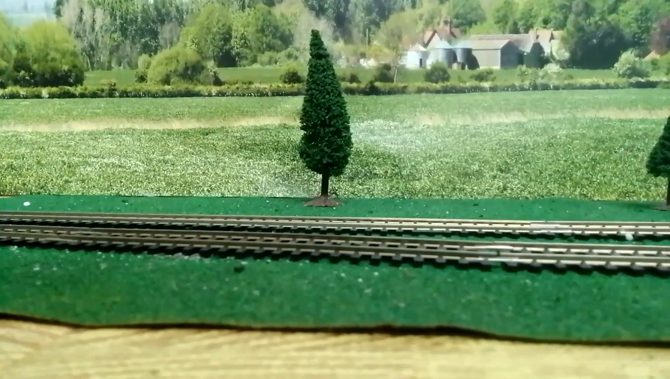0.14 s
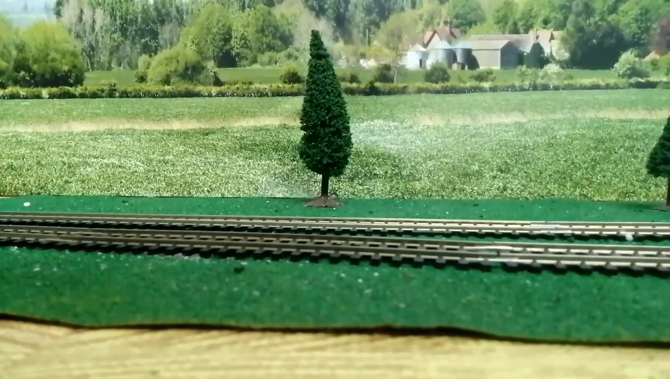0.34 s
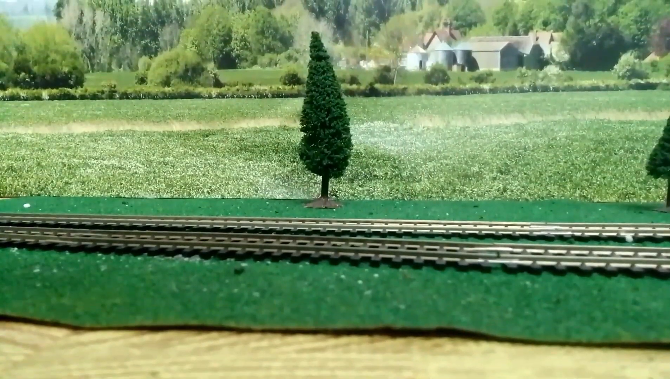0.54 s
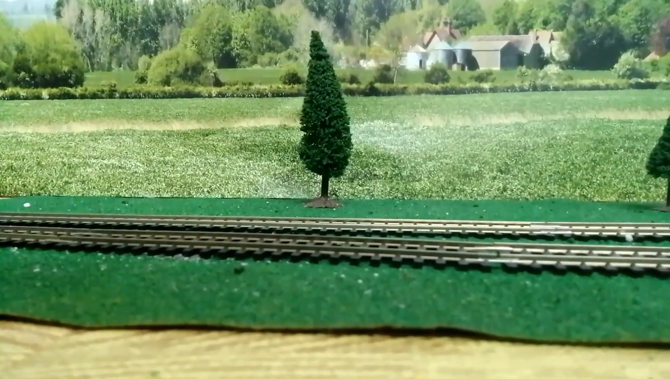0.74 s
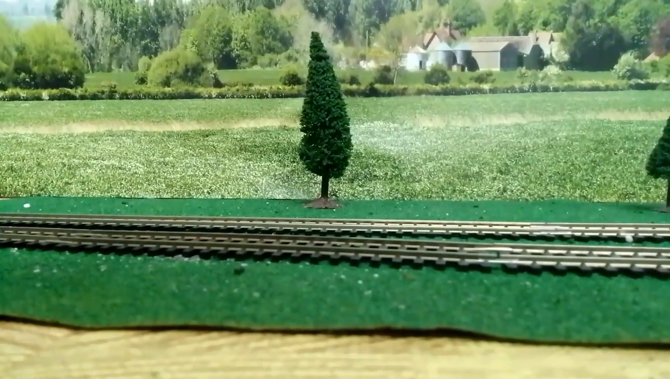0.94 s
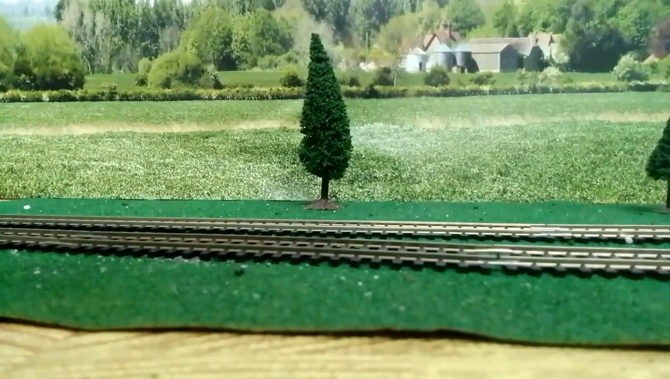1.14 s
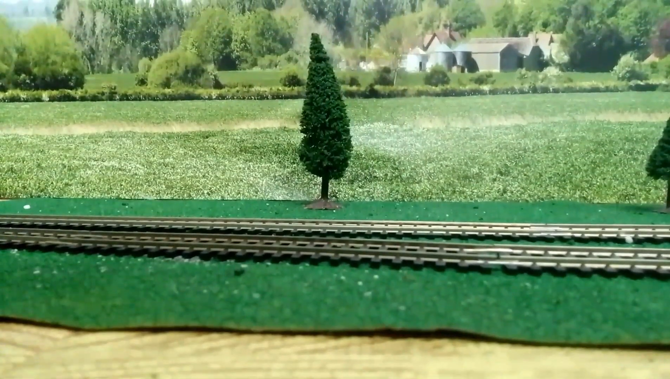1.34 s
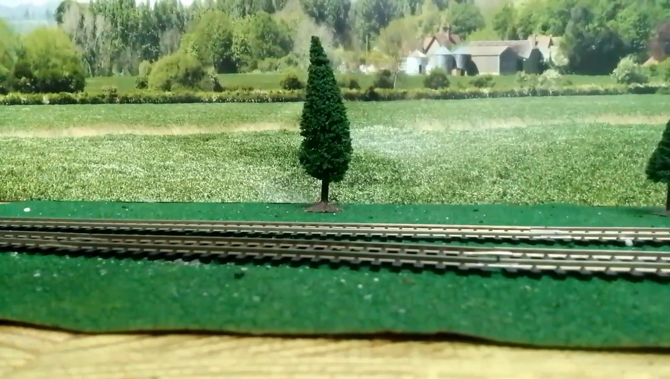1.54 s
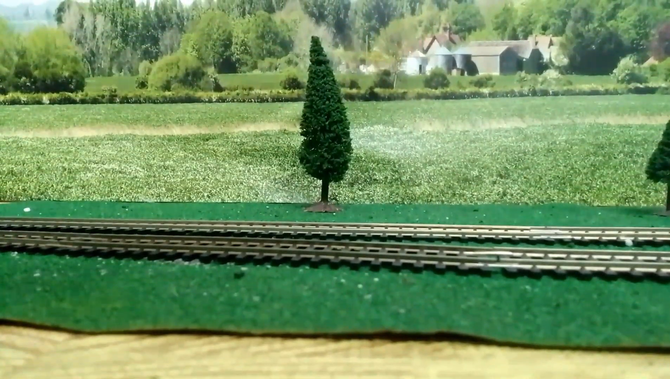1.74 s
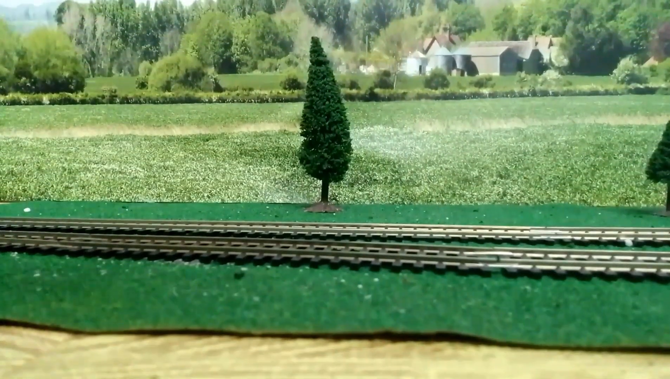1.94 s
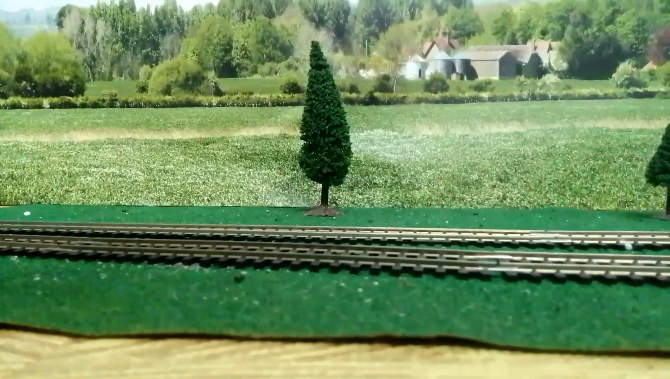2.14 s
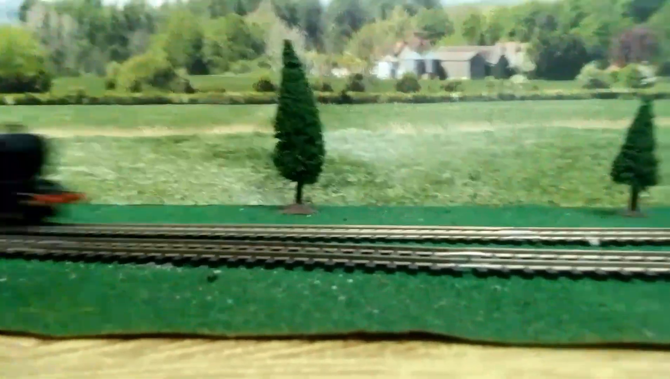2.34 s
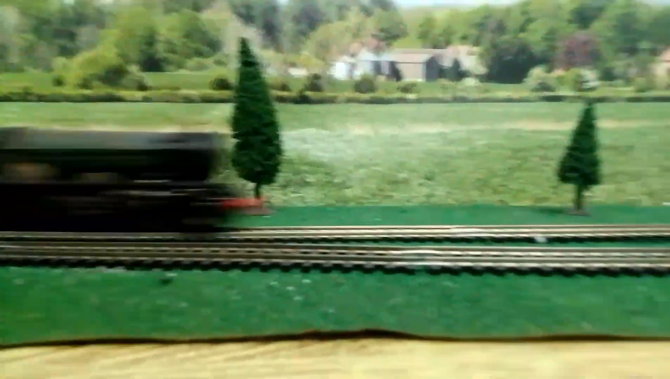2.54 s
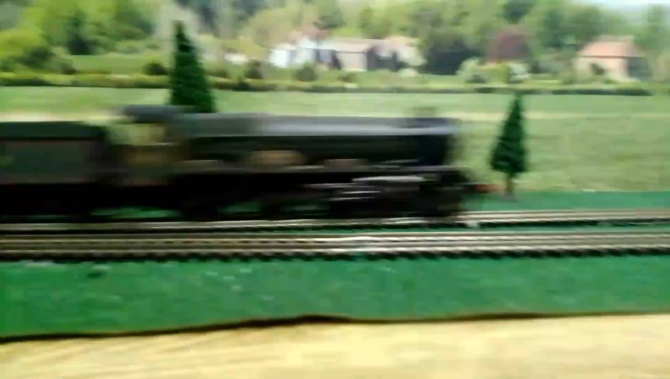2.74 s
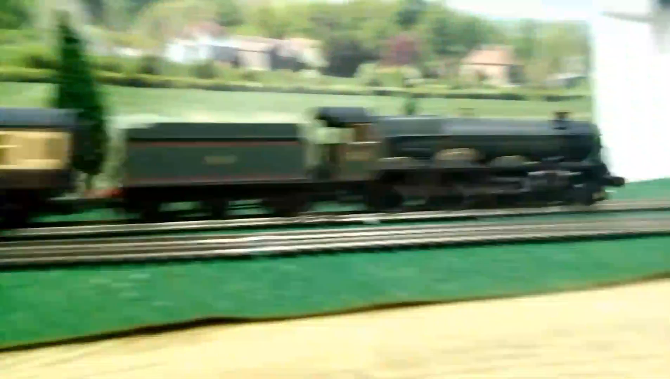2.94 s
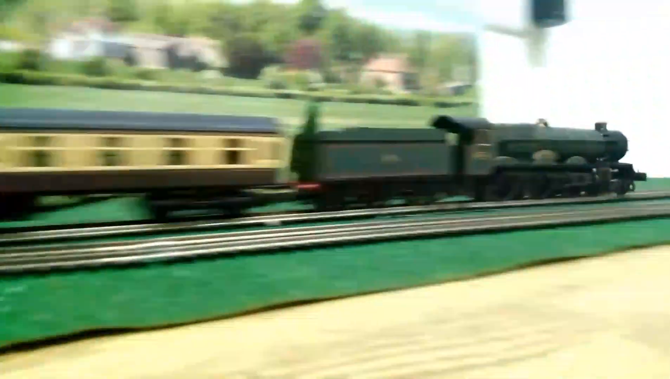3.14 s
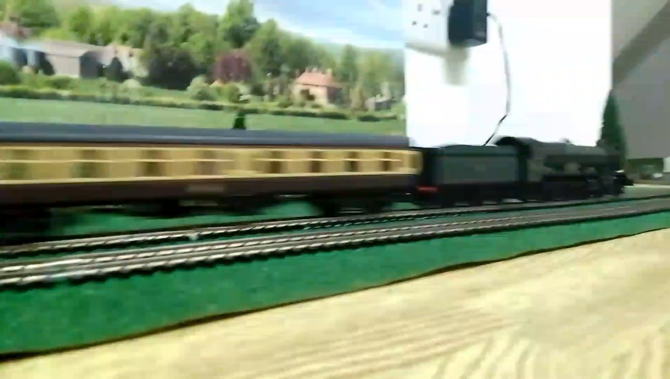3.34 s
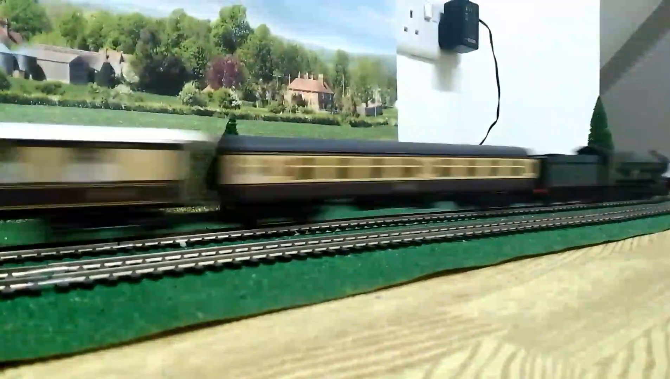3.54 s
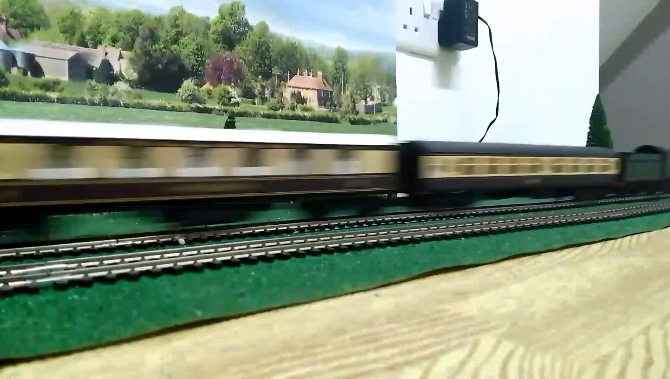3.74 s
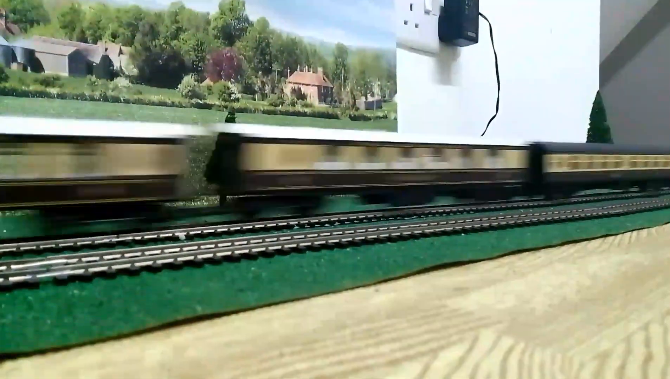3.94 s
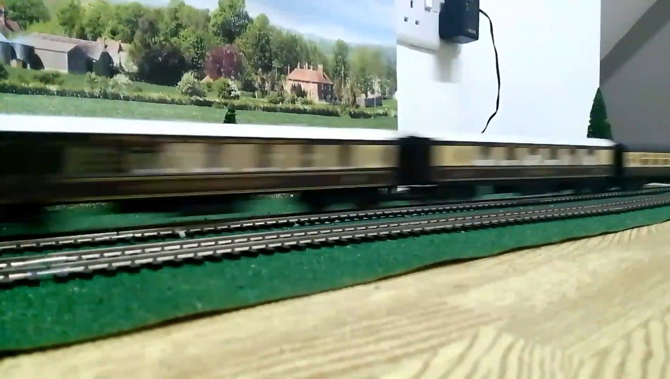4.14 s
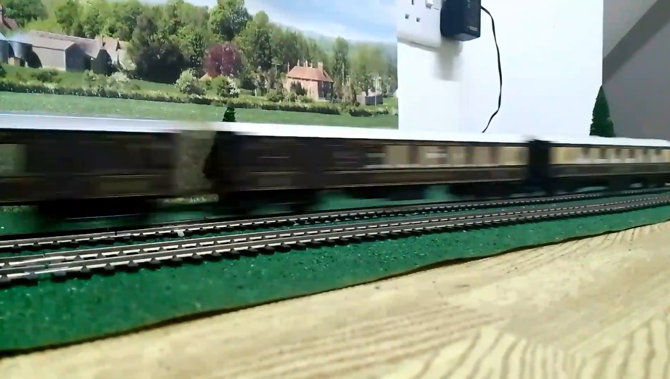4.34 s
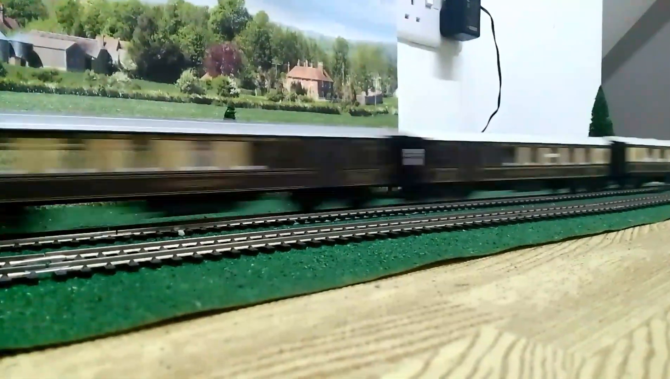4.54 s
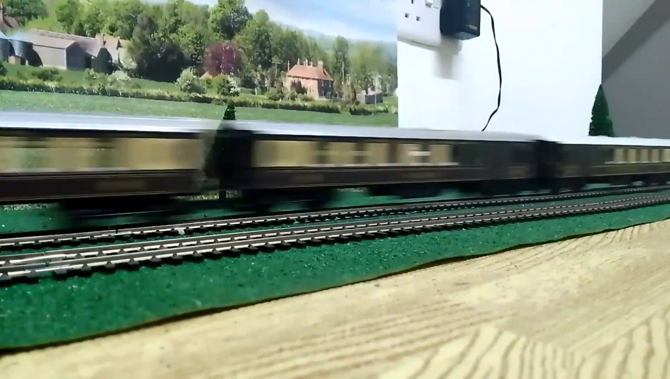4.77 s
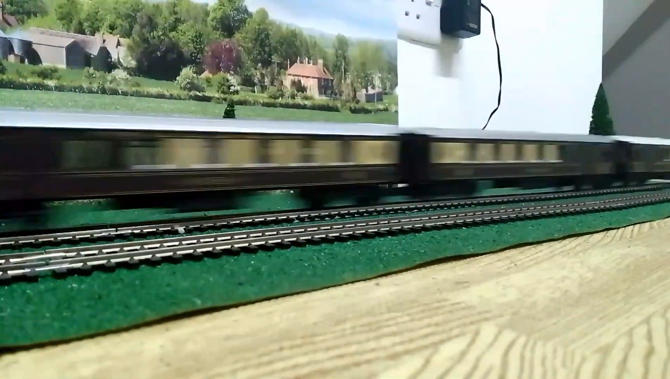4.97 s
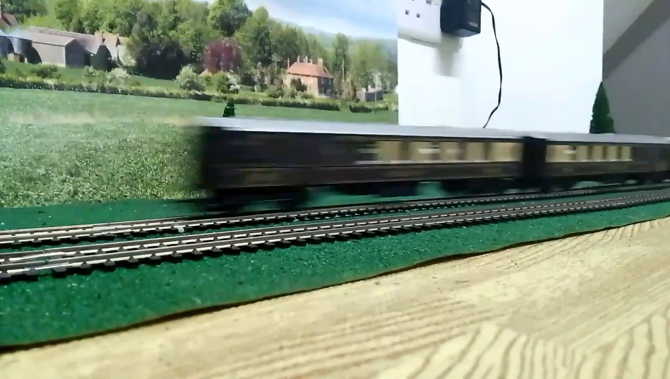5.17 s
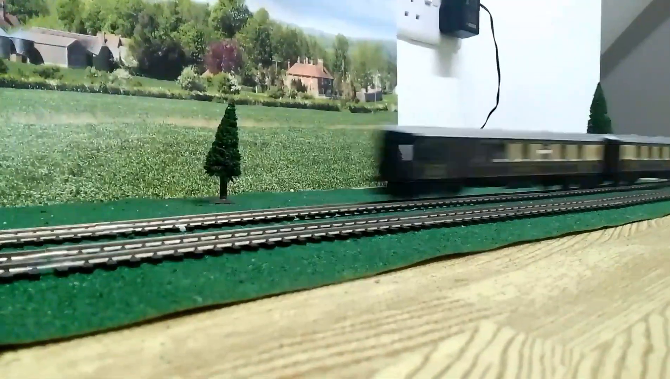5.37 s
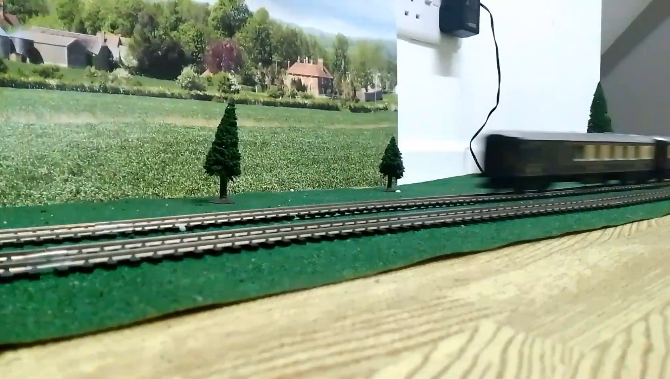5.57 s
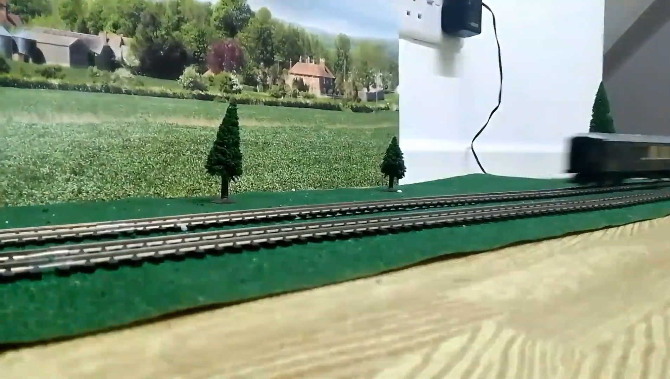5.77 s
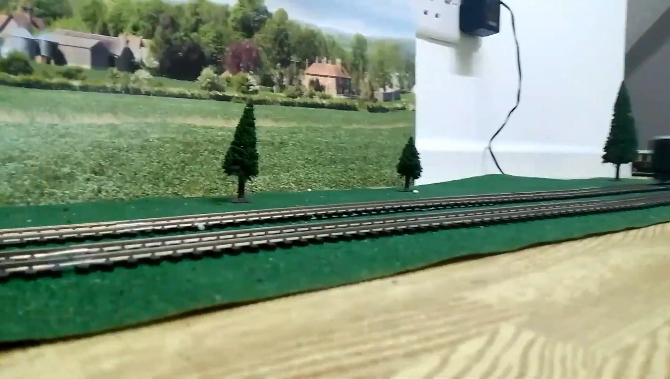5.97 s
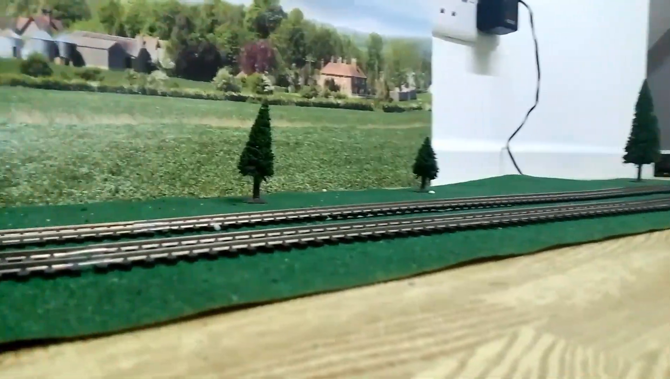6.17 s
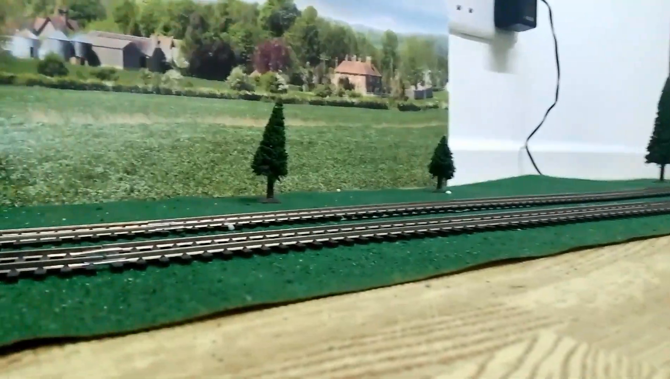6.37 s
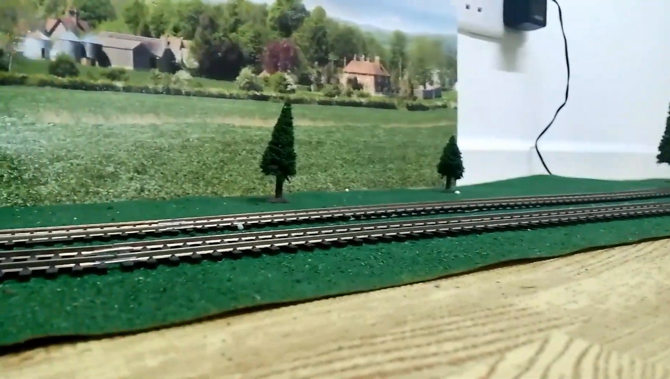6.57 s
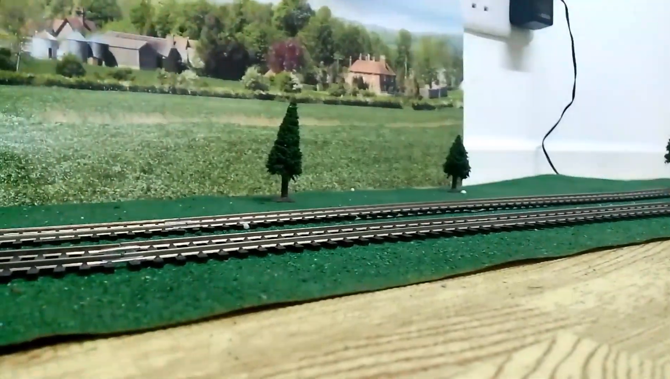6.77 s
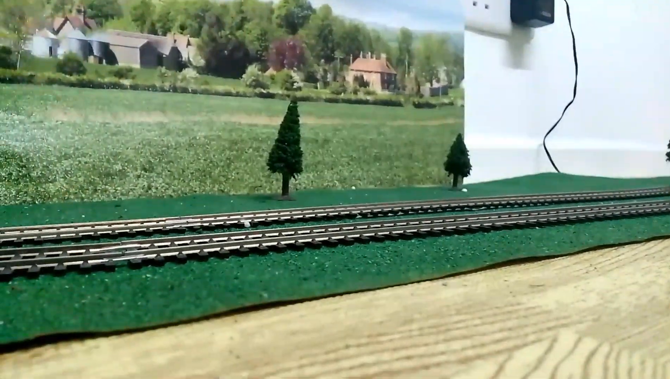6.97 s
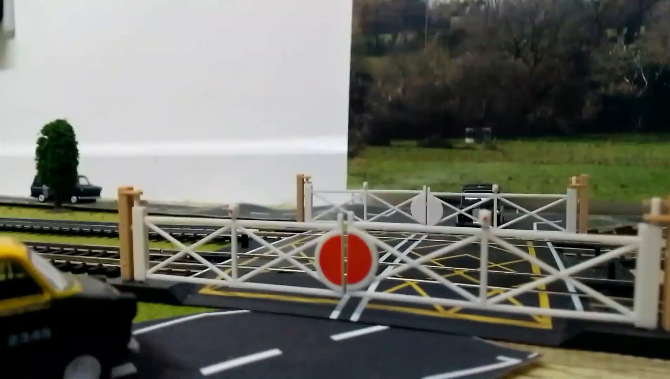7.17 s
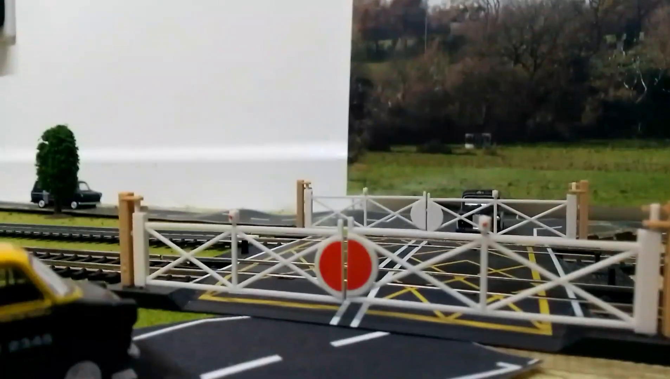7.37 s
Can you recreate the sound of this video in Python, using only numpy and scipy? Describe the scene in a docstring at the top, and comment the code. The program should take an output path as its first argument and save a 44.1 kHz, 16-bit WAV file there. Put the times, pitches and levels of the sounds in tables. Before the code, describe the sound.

A model train rolls fast past on hissing rails, with clicking wheels, rasping gears and a drumming wooden board, then fades away.

```python
"""Small wheels chatter on hissing rails and a wooden baseboard drums and hums, as a model steam engine
pulls five coaches fast towards a phone and close past it. Wheels click over rail joints, their rims rub
and sing, and the gears rasp as the engine goes by. The phone's noise suppressor turns down the weak
frequency bands while the train is far off, and the sound stops dead near the end."""
import sys
import numpy as np
from scipy import signal
from scipy.fft import rfft, irfft, next_fast_len
from scipy.io import wavfile
from scipy.ndimage import uniform_filter1d

SR = 44100
rng = np.random.default_rng(int(sys.argv[2]) if len(sys.argv) > 2 else 0)


def int16_out(signal):
    """Quantize to a 16-bit WAV file."""
    q = np.round(np.clip(np.atleast_2d(signal).T, -1, 1) * 32767)
    wavfile.write(sys.argv[1], SR, q.astype(np.int16))


N = 326820
TIME = np.arange(N) / SR

# the tone of each source, as how strong it is at each frequency: (f/Hz, level/dB)
BOARD_TONE = [(110, -34), (170, -25), (240, -8.5), (380, -6.5), (540, -8.5), (740, -5), (880, -4),
              (1020, 0), (1350, -1.5), (1750, -8.5), (2100, -7.5), (2500, -16), (4000, -27)]
RAIL_TONE = [(120, -52), (1500, -27), (2500, -14.5), (3300, -14), (4200, -10.5), (5200, -6.5), (5900, -3.5),
             (6350, 0.5), (7200, -5.5), (7800, -7), (8800, -13.5), (10000, -17.5), (12000, -20.5),
             (13500, -32.5), (15700, -31)]
COACH_TONE = [(120, -34.5), (600, -26), (1700, -6.5), (2100, 4.5), (2450, -4), (2750, 2.5), (3150, -5),
              (4100, 1), (4700, -3), (8500, -7.5), (10000, -27), (15000, -22.5)]
ROOM_TONE = [(25, 14), (42, -9), (60, -14), (100, -12), (300, 7), (2000, -3), (15000, -5)]
GEAR_HISS_TONE = [(120, -55), (1200, -12), (1750, 2), (2700, -34.5), (4500, -2), (5500, 5), (6600, -11.5),
                  (7600, 7), (9000, -5), (9900, -14.5), (10700, -21), (12000, -8), (14000, -30.5)]
# the treble brightens and dulls as the train goes by: (middle t/s, half length t/s, level/dB)
TREBLE_SWELLS = [(2.92, 0.16, 3), (4.385, 0.072, 4), (4.74, 0.11, -7), (4.95, .05, 1)]
# baseboard panels humming under the train: (start t/s, end t/s, f/Hz, width f/Hz, level/dB)
PANEL_HUMS = [(0.49, 3.4, 264, 6.2, -60), (0.88, 3.4, 306, 12, -57.5), (0.28, 7.3, 386, 16, -63),
              (3.55, 7.3, 230, 20, -61), (3.7, 5.15, 284.6, 8.4, -56), (0.51, 4.3, 965, 30, -56)]
# wheels striking rail joints, and the first wheel bouncing down again just after: (t/s, relative rail level/dB,
# board level/dB)
JOINT_HITS = [(0.4479, -20, -41.5), (0.459, -25.5, -45.5), (0.9492, -26, -33.5), (1.3169, -26.5, -36),
              (1.36, -32, -30), (1.552, -37, -30), (1.592, -25.5, -28), (3.869, -21.5, -43),
              (4.056, -29.5, -44.5), (4.327, -23, -43.5), (4.364, -27.5, -36), (4.655, -20.5, -41.5),
              (4.8839, -21, -40), (4.9402, -21, -43)]
# flanges (the wheels' guiding rims) rubbing the rail: (middle t/s, half length t/s, level/dB)
FLANGE_RUBS = [(.66, .2, -41.5), (3.19, 0.14, -30.5), (3.55, .12, -39.5), (3.88, 0.1, -36),
               (4.688, 0.083, -35.5), (4.983, 0.12, -35.5)]
# the notes at which the flanges and the engine's shell ring: (f/Hz, width f/Hz, relative level/dB)
FLANGE_NOTES = [(5500, 460, 0.5), (6050, 480, -2.7)]
SHELL_NOTES = [(1850, 190, -10), (2074, 90, 5.5)]
# the phone takes anything weaker than this for noise: (f/Hz, level/dB in a 1 Hz band)
NOISE_THRESHOLD = [(150, -79.5), (250, -84.5), (400, -85.5), (1700, -80.0), (3200, -79.5),
                   (4500, -78.0), (9800, -77.5), (11000, -76)]
# the phone's thin bass: (f/Hz, level/dB)
PHONE_BASS = [(40, -1.5), (75, -15.5), (140, -0.5), (230, 0)]


def amp(db):
    """Turn decibels into a number to multiply by."""
    return 10 ** (np.asarray(db) / 20)


def unit(x):
    """Scale x to an average power of 1."""
    return x / np.sqrt(np.mean(x ** 2) + 1e-20)


def along(points, hz):
    """Read between (f/Hz, value) points, with the octaves evenly spaced."""
    f, v = np.transpose(points)
    return np.interp(np.log(hz + 1), np.log(f + 1), v)


def wobble(rate):
    """A random curve that heads for a new value rate times a second."""
    values = rng.standard_normal(int(N * rate / SR) + 2)
    return np.interp(TIME * rate, np.arange(len(values)), values)


def swell(middle_s, half_s):
    """A smooth rise to 1 and fall."""
    return np.exp(-((TIME - middle_s) / half_s) ** 2 / 2)


def filtered(x, response):
    """Multiply each frequency in x by response(hz)."""
    size = next_fast_len(N + SR // 2)
    return irfft(rfft(x, size) * response(np.fft.rfftfreq(size, 1 / SR)), size)[:N]


def ring(x, tone, size=4096):
    """Let x shake an object that has this tone."""
    cepstrum = irfft(np.log(amp(along(tone, np.fft.rfftfreq(size, 1 / SR)))))
    # fold it so that the ringing comes after each tap, never before
    cepstrum[1:size // 2] *= 2
    cepstrum[size // 2 + 1:] = 0
    one_tap = irfft(np.exp(rfft(cepstrum)))
    return signal.fftconvolve(x, one_tap / np.linalg.norm(one_tap))[:N]


def resonate(x, notes):
    """Let x shake an object that rings at these notes and gives off little bass."""
    def response(f):
        peaks = sum(amp(db) * 1j * f * width / (hz * hz - f * f + 1j * f * width)
                    for hz, width, db in notes)
        return peaks * np.minimum(f / notes[0][0], 1) ** 2
    return filtered(x, response)


def passing(closest_s, reach_m, coming, going, speed_m_per_s=0.8):
    """Level in dB, 0 when closest; past reach_m it falls as distance to the power coming or going."""
    place_m = speed_m_per_s * (TIME - closest_s)
    return -10 * np.where(place_m < 0, coming, going) * np.log10(1 + (place_m / reach_m) ** 2)


def chatter(rate, spread_db, smooth_db):
    """Tiny wheel taps of uneven size, rate a second, over the smooth noise of rolling."""
    hits = (rng.random(N) < rate / SR) * rng.choice([-1, 1], N)
    sizes = amp(spread_db * np.clip(rng.standard_normal(N), -2, 2))
    return unit(unit(hits * sizes) + amp(smooth_db) * rng.standard_normal(N))


def drift(x, patchy_db, size=1024):
    """Echoes shift as the train moves, so narrow bands slowly swell and sink; the bass is spared."""
    hz, _, bands = signal.stft(x, SR, nperseg=size)
    sway = uniform_filter1d(rng.standard_normal(bands.shape), size=3, axis=0)
    sway -= uniform_filter1d(sway, size=13, axis=0)  # what one band loses its neighbours gain
    sway = uniform_filter1d(uniform_filter1d(sway, size=40, axis=1), size=12, axis=1)
    depth_db = patchy_db * along([(300, 0), (1200, 1)], hz)[:, None]
    gain = unit(amp(depth_db * np.clip(unit(sway), -2, 2)))
    return signal.istft(bands * gain, nperseg=size)[1][:N]


def rolling():
    """Wheels shake the board, rails and coaches; the board carries far, the coaches only close by."""
    board_db = -38.47 + passing(closest_s=2.78, reach_m=1.84, coming=1.24, going=0.96)
    rail_db = -32.7 + passing(closest_s=4.215, reach_m=1.594, coming=0.92, going=1.2)
    coach_db = -39.8 + passing(closest_s=4.46, reach_m=0.71, coming=0.74, going=1.44)
    # the treble opens up as the wheels come to face the phone
    lift_db = 1.5 + passing(closest_s=3.54, reach_m=2.1, coming=0.75, going=0.051)
    lift_db += sum(db * swell(s, half_s) for s, half_s, db in TREBLE_SWELLS)
    jolt_db = 0.61 * wobble(25) + 0.6 * wobble(140)  # all three share the bumps of the ride
    board = amp(board_db) * ring(chatter(rate=1200, spread_db=2, smooth_db=2), BOARD_TONE)
    rails = amp(rail_db) * ring(chatter(rate=1400, spread_db=2, smooth_db=2.5), RAIL_TONE)
    coaches = amp(coach_db) * ring(chatter(rate=900, spread_db=3.5, smooth_db=-4), COACH_TONE)
    treble = filtered(rails + coaches, lambda hz: along([(6800, 0.099), (8600, 0.6)], hz))
    ride = board + rails + coaches + (amp(lift_db) - 1) * treble
    return drift(amp(jolt_db) * ride, patchy_db=1.83)


def room():
    """The faint hush of the room."""
    return amp(-58) * unit(ring(rng.standard_normal(N), ROOM_TONE))


def panels(fade_s=0.3):
    """Each panel of the baseboard hums at its own note while the train crosses it."""
    hum = np.zeros(N)
    for start, end, hz, width, db in PANEL_HUMS:
        load = np.clip(np.minimum(TIME - start, end - TIME) / fade_s + 0.5, 0, 1)
        hum += amp(db) * load * unit(resonate(rng.standard_normal(N), [(hz, width, 0)]))
    return hum


def joints(crack_s=0.017, rattle_s=0.41, rattle_db=-15):
    """A wheel drops into a gap: a crack in the rail, a short rattle after it and a knock in the board."""
    blows = np.zeros((2, N + SR))
    t = np.arange(SR // 4) / SR
    fade = amp(-60 * t / crack_s) + amp(rattle_db - 60 * t / rattle_s)
    for s, rail_db, board_db in JOINT_HITS:
        start = round(s * SR)
        burst = fade * rng.standard_normal(len(t))
        blows[:, start:start + len(t)] += amp([[rail_db], [board_db]]) * burst
    on_rail, on_board = blows[:, :N]
    return amp(-4) * ring(on_rail, RAIL_TONE) + ring(on_board, BOARD_TONE)


def flanges():
    """Now and then a wheel's rim leans on the rail and sings."""
    pressure = sum(amp(db) * swell(s, half_s) for s, half_s, db in FLANGE_RUBS)
    rubbing = ring(chatter(rate=1400, spread_db=3, smooth_db=0), RAIL_TONE)
    return pressure * unit(resonate(rubbing, FLANGE_NOTES))


def engine(motor_hz=136, depth=0.22, start_s=2.26, end_s=3.57, rise_s=0.16, fall_s=0.09):
    """The gears scrape harder once a motor turn; the shell rings with it and the driving wheels hiss."""
    rasp_db = -31.4 + passing(closest_s=3.1, reach_m=0.31, coming=1.4, going=1.0)
    hiss_db = -35 + passing(closest_s=3.0, reach_m=0.29, coming=1.0, going=1.1)
    in_earshot = np.clip(np.minimum((TIME - start_s) / rise_s, (end_s - TIME) / fall_s), 0, 1)
    turns = np.cumsum(motor_hz * (1 + 0.0687 * wobble(30))) / SR
    scrape = (1 + depth * np.cos(2 * np.pi * turns)) * amp(1.5 * wobble(45))
    rasp = unit(resonate(scrape * chatter(rate=1500, spread_db=3, smooth_db=1.5), SHELL_NOTES))
    hiss = unit(ring(np.sqrt(np.abs(scrape)) * rng.standard_normal(N), GEAR_HISS_TONE))
    return in_earshot * (amp(rasp_db) * rasp + amp(hiss_db) * hiss)


def scene():
    """The train in a quiet room."""
    return (rolling() + panels() + engine() + flanges() + joints() + room())[None]


def suppress(x, depth_db=12, memory_s=0.21, knee_db=0.4, size=512):
    """The phone turns down bands that stay weak, as if they were noise."""
    hz, _, bands = signal.stft(x, SR, nperseg=size, scaling="psd")
    power = uniform_filter1d(2 * np.abs(bands) ** 2, round(memory_s * SR * 2 / size), axis=1)
    over_db = 10 * np.log10(np.abs(power) + 1e-20) - along(NOISE_THRESHOLD, hz)[:, None]
    too_weak = (1 - np.tanh(over_db / (2 * knee_db))) / 2  # 1 well under the threshold, 0 well over
    shut = uniform_filter1d(too_weak, size=16, axis=1)
    return signal.istft(bands * amp(-depth_db * shut), SR, nperseg=size, scaling="psd")[1][:N]


def record(dry, stop_s=7.142, top_hz=15720):
    """The phone suppresses noise, stops dead, thins the bass and loses the highest treble."""
    sound = suppress(dry[0]) * (TIME < stop_s)
    return filtered(sound, lambda hz: amp(along(PHONE_BASS, hz)) * (hz < top_hz))[None]


dry = scene()
out = record(dry)
int16_out(out)
```